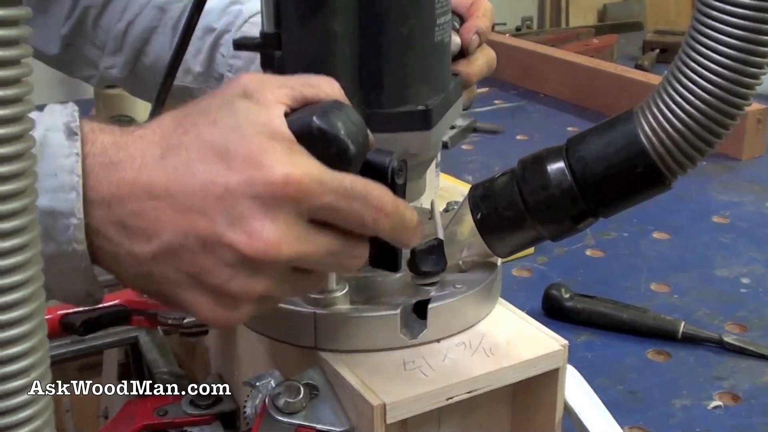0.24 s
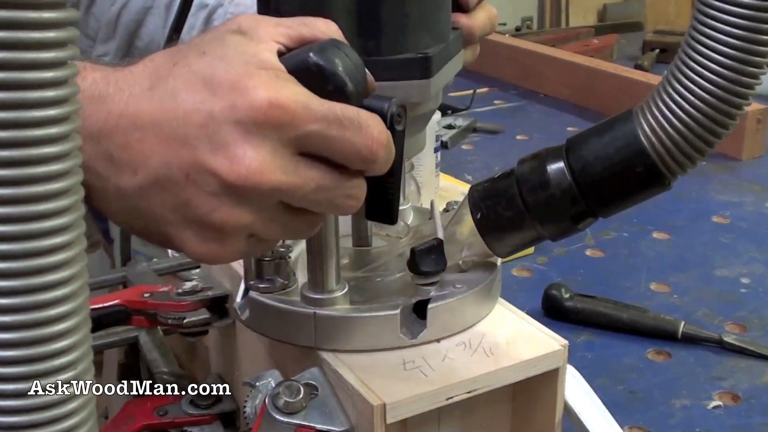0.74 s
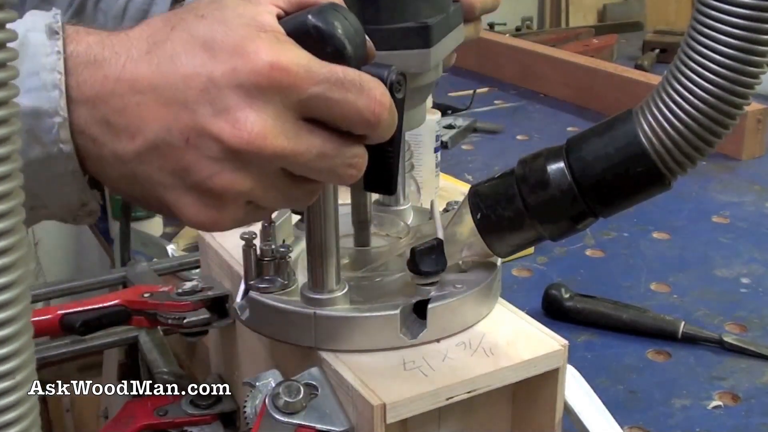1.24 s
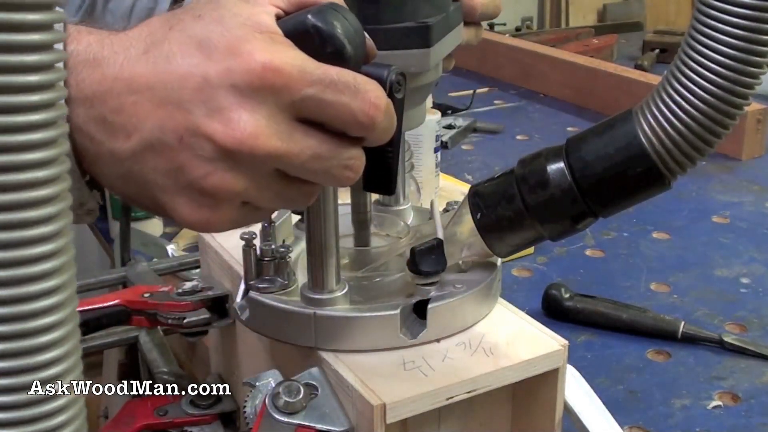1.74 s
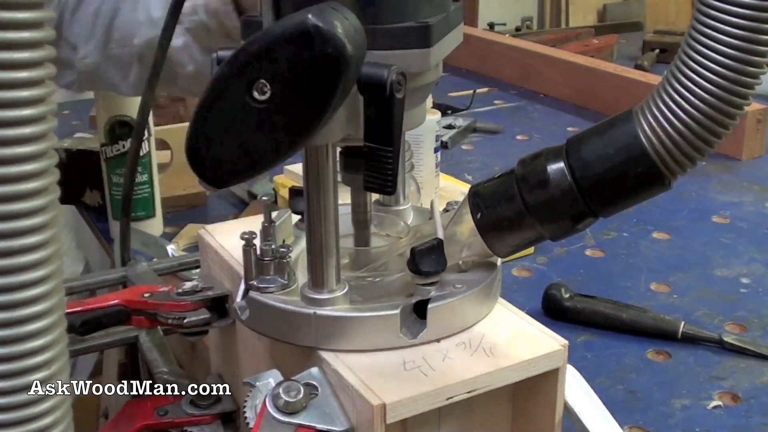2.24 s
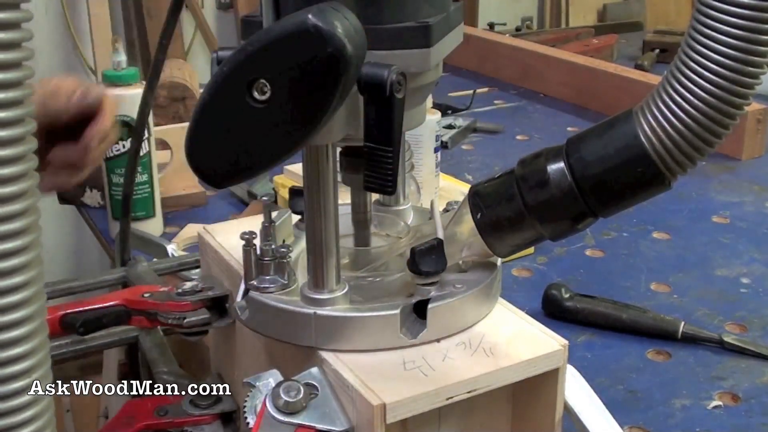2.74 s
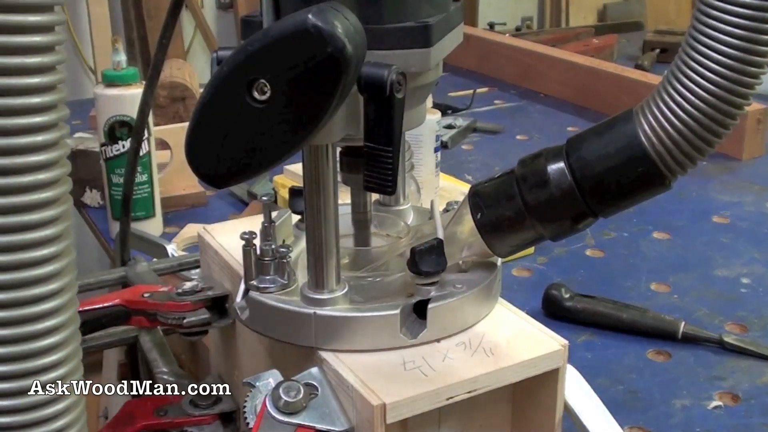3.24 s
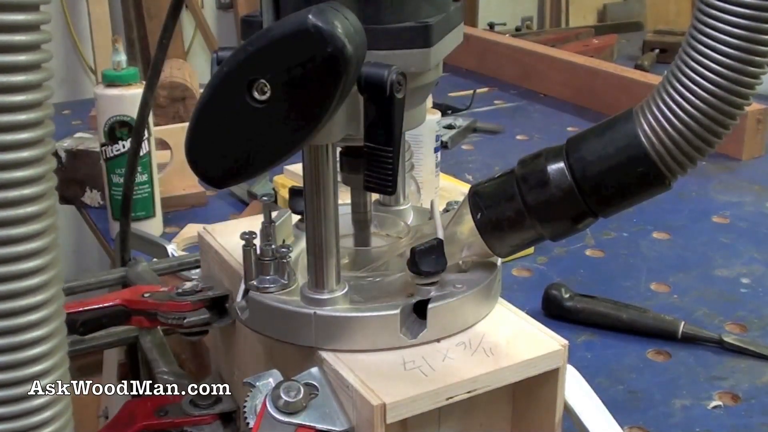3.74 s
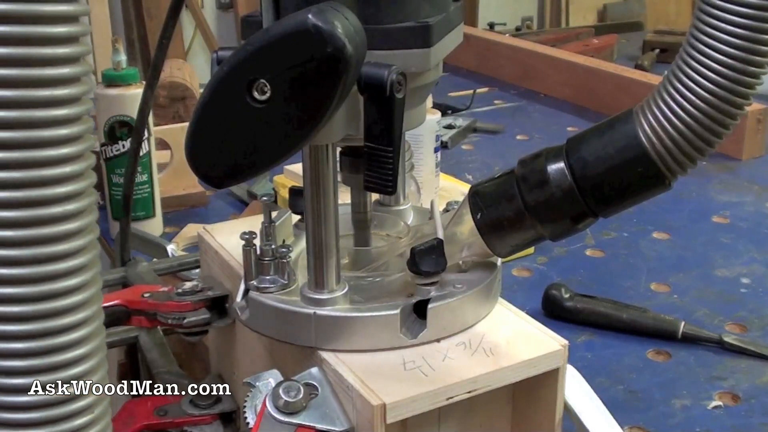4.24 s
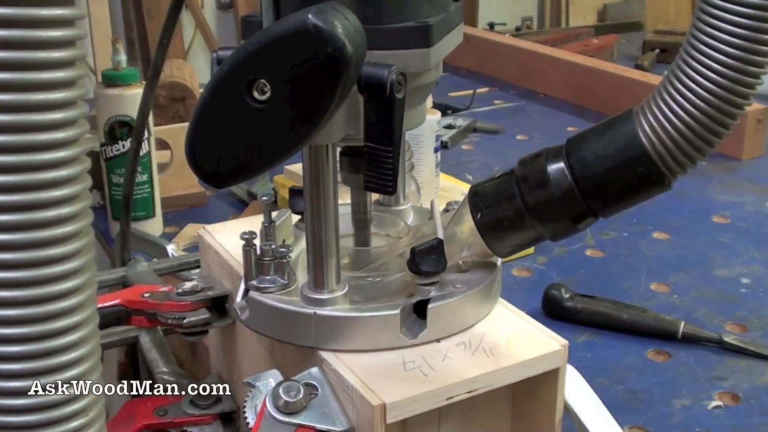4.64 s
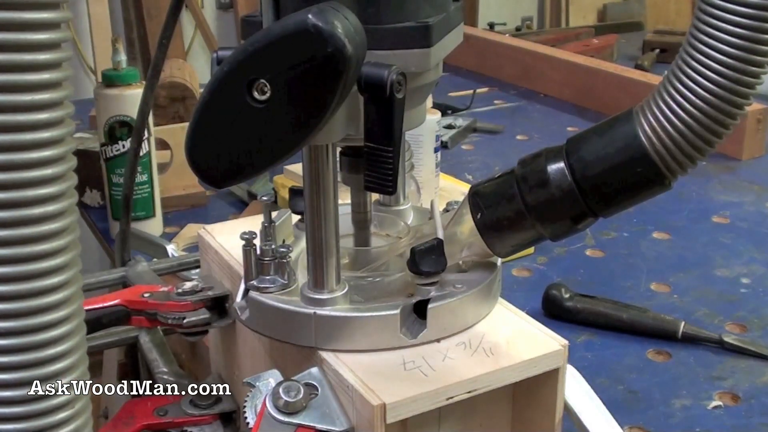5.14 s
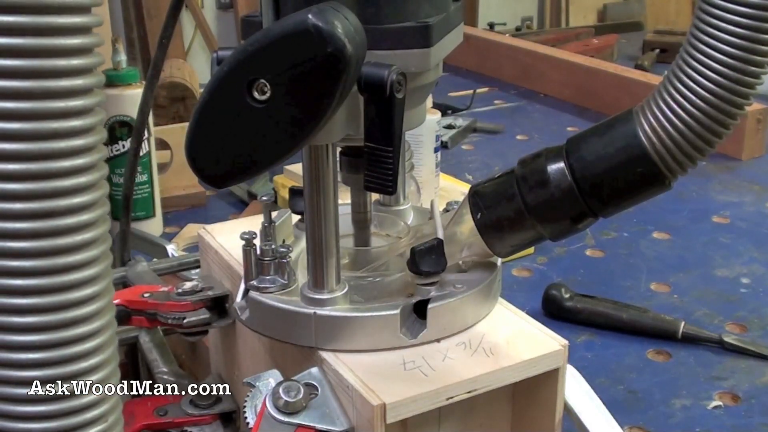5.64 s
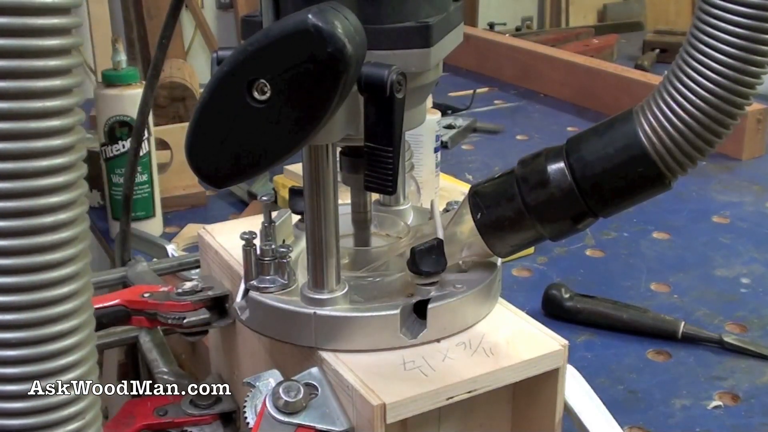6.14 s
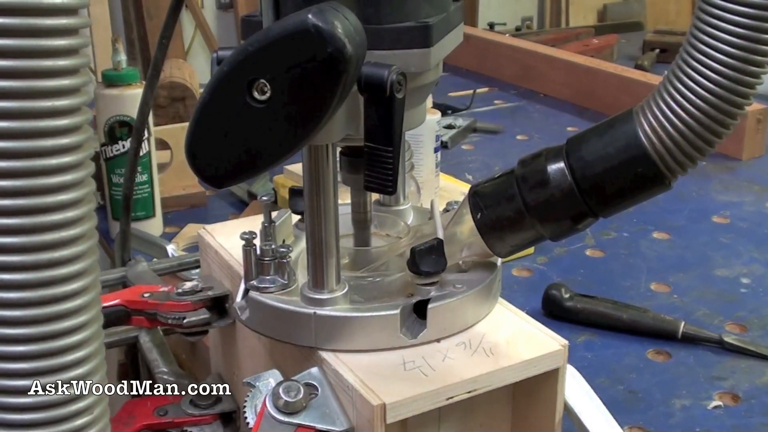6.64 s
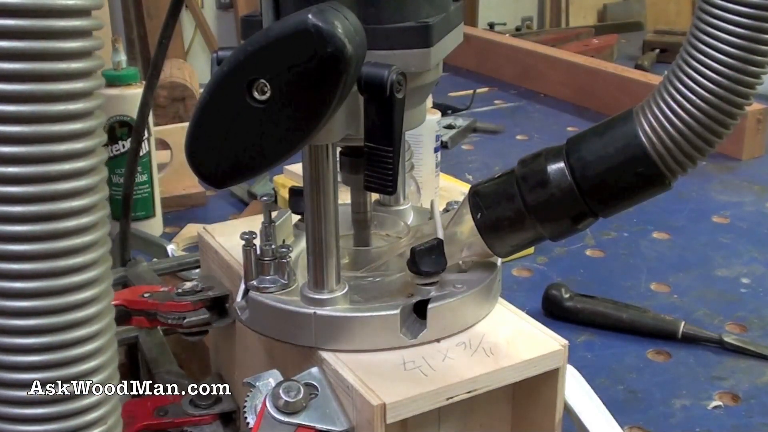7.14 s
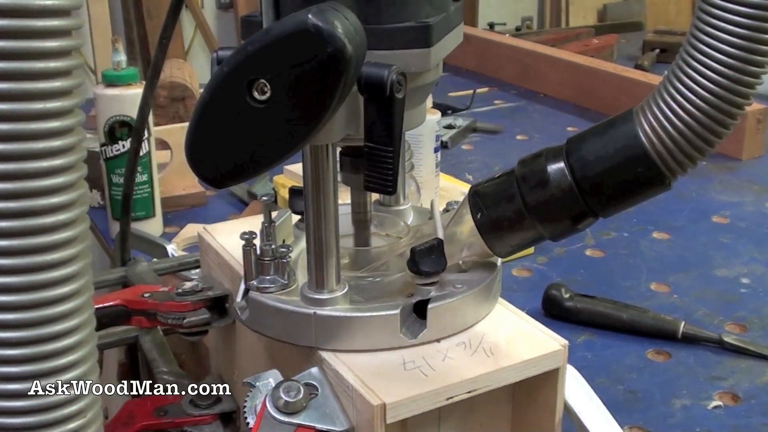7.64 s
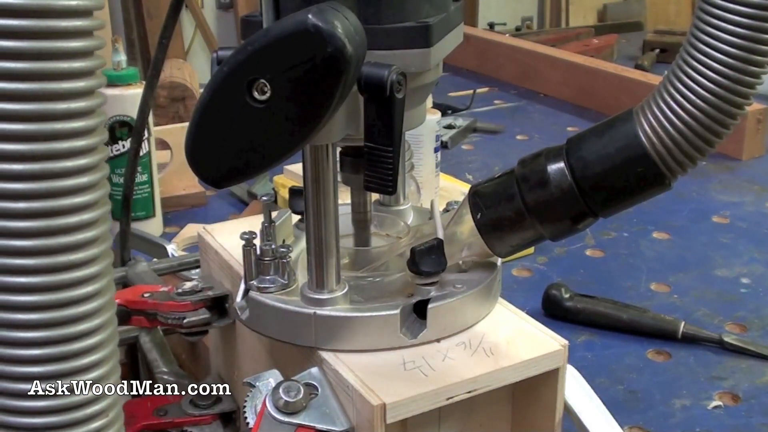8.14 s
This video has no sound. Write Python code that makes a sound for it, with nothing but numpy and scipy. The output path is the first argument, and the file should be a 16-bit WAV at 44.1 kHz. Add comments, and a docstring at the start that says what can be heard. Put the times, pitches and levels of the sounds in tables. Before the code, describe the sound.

A router finishes cutting wood, whines freely, then is switched off and slowly winds down over a humming dust extractor.

```python
"""A plunge router ends a cut in wood in a small workshop; a dust extractor rumbles and hums throughout.
At 0.36 s the bit leaves the wood and runs free; the 20-blade cooling fan whines like a siren over rushing air.
Switched off at 1.6 s, the shaft coasts: the whine falls, a dull swirl and a hollow roar near 680 Hz swell, and
harmonics from brushes and bearings slide through the ringing housing. The unbalanced shaft sweeps the bench's
resonances; a soft rumble swells near 3.4 s and a low groan sinks. The roar dies away with the router."""
import sys
import numpy as np
from scipy import signal
from scipy.fft import rfft, irfft, next_fast_len
from scipy.io import wavfile
from scipy.ndimage import uniform_filter1d, minimum_filter1d

SR = 44100
rng = np.random.default_rng(int(sys.argv[2]) if len(sys.argv) > 2 else 0)


def output_pcm(signal):
    """Save a mono or channel-first signal as 16-bit PCM at the path in sys.argv[1].

    Samples are clipped to [-1, 1] before scaling.
    """
    pcm = np.clip(np.atleast_2d(signal).T, -1, 1) * 32767
    wavfile.write(sys.argv[1], SR, np.round(pcm).astype(np.int16))


N = 370881
TIME_S = np.arange(N) / SR
FREE_SHAFT_HZ, FAN_BLADES = 336.25, 20
CUT_END_S, LOAD_RELEASE_S, SWITCH_OFF_S = 0.36, 0.25, 1.5974
CUTOFF_HZ = 15750


def from_db(db):
    """Decibels to gain."""
    return 10 ** (np.asarray(db) / 20)


def unit_rms(x):
    """Scale to rms 1."""
    return x / np.sqrt(np.mean(x ** 2) + 1e-20)


def envelope(curve):
    """Gain per sample from (time [s], level [dB]) points."""
    return from_db(np.interp(TIME_S, *np.transpose(curve)))


def coloured(x, spectrum):
    """Filter by (frequency [Hz], gain [dB]) points; the bass rolls off below the first."""
    hz, db = np.transpose(spectrum)
    size = next_fast_len(N + 4096)
    bins_hz = np.maximum(np.fft.rfftfreq(size, 1 / SR), 1)
    gain = from_db(np.interp(np.log(bins_hz), np.log(hz), db)) * np.minimum(bins_hz / hz[0], 1)
    return irfft(rfft(x, size) * gain, size)[..., :N]


def drift(rate_hz, hop=40):
    """Slow random wander, rms 1."""
    pole = np.exp(-2 * np.pi * hop * rate_hz / SR)
    noise = rng.standard_normal(N // hop + 2002)
    slow = signal.lfilter([1], [1, -2 * pole, pole ** 2], noise)[2000:]
    return np.interp(np.arange(N) / hop, np.arange(len(slow)), unit_rms(slow))


def rush(spectrum):
    """Turbulent noise of a given colour, rms 1."""
    return unit_rms(coloured(rng.standard_normal(N), spectrum))


def tone(cycles):
    """Sine of rms 1 from a running cycle count."""
    return np.sqrt(2) * np.sin((2 * np.pi * (cycles % 1)).astype(np.float32))


def ringing(x, modes):
    """Output of narrow resonances driven by x."""
    return sum(from_db(db) * signal.lfilter(*signal.iirpeak(hz, hz / width_hz, fs=SR), x)
               for hz, width_hz, db in modes)


def in_cut(release_s):
    """1 while the bit is in the wood, then an exponential decay."""
    return np.exp(-np.maximum(TIME_S - CUT_END_S, 0) / release_s)


def shaft_speed_hz(sag_hz=0.85, friction_hz_per_s=21.121, drag_hz_per_s=54.016, drag_power=2.2005):
    """The shaft sags under load; after switch-off, dry friction and fan drag brake it."""
    times_s, step_s = np.linspace(SWITCH_OFF_S, TIME_S[-1], 7000, retstep=True)
    hz = [FREE_SHAFT_HZ]
    for _ in times_s[1:]:
        braking = friction_hz_per_s + drag_hz_per_s * (hz[-1] / FREE_SHAFT_HZ) ** drag_power
        hz.append(hz[-1] - step_s * braking)
    return np.interp(TIME_S, times_s, hz) - sag_hz * in_cut(LOAD_RELEASE_S)


# Bit buzz: (order [x shaft speed], cutting level [dB], free level [dB])
BIT_ORDERS = [(2, -25.5, -33), (4, -19.5, -50), (6, -20, -42), (16, -22.5, -80)]
# Chip noise: (frequency [Hz], relative density [dB])
CHIP_SPECTRUM = [(300, -20), (700, -11), (1700, 8), (2600, 6), (4500, -10), (6500, 1), (9000, 3),
                 (12000, -8), (15500, -32)]
def bit(turns, shaft_hz, rough_db=0.9, chips_db=-12.5):
    """Two edges bite each turn and throw chips; out of the wood they only stir the air."""
    load = in_cut(LOAD_RELEASE_S)
    stir = (shaft_hz / FREE_SHAFT_HZ) ** 3.1
    buzz = np.zeros(N)
    for order, cut_db, free_db in BIT_ORDERS:
        gain = from_db(cut_db) * load + from_db(free_db) * stir
        buzz += gain * from_db(rough_db * drift(26)) * tone(order * turns + rng.random())
    chips = rush(CHIP_SPECTRUM) * (1 + 0.17 * tone(2 * turns))
    return buzz + from_db(chips_db) * in_cut(release_s=0.067) * chips


# Impeller rumble: (frequency [Hz], relative density [dB])
RUMBLE_SPECTRUM = [(40, -26), (90, -34), (106, -20), (124, 1), (160, 4), (190, 0.5), (300, 3), (450, 0.5),
                   (800, -21)]
# Impeller hum: (frequency [Hz], level [dB re rumble])
HUM_TONES = [(56.5, -31), (113, -14), (168, -12), (226.1, -12), (279.9, -11.5), (339.1, -11), (393, -10),
             (672.9, -13), (1254, -11)]
def dust_extractor(rumble_db=-42, waver_db=5.5, wander_cycles=0.17):
    """The impeller rumbles steadily, with a wavering hum."""
    hum = sum(from_db(db + waver_db * drift(5)) * tone(hz * TIME_S + wander_cycles * drift(2))
              for hz, db in HUM_TONES)
    return from_db(rumble_db) * (rush(RUMBLE_SPECTRUM) + hum)


# Cooling air: (frequency [Hz], relative density [dB])
AIR_SPECTRUM = [(130, -31), (450, -13), (1200, -6), (1800, -5), (2400, -1.5), (3900, -1), (5100, -4.5),
                (6400, -2.5), (7400, -3), (8800, -3), (9800, -10.5), (10500, -13.5), (12000, -14),
                (15500, -28.5)]
# Air cavities: (frequency [Hz], width [Hz], gain [dB])
CAVITY_MODES = [(1310, 200, -10), (3180, 250, -9.5), (3880, 140, -5.5), (5970, 360, 0), (7600, 220, -39)]
def cooling_air(shaft_hz, full_speed_db=-8.5):
    """Air rushes through the router's cavities, dying with the shaft speed."""
    flow = from_db(full_speed_db) * (shaft_hz / FREE_SHAFT_HZ) ** 1.61
    air = rush(AIR_SPECTRUM)
    return flow * unit_rms(air + ringing(air, CAVITY_MODES))


# Fan whine: (time [s], level [dB])
WHINE_LEVEL = [(0, -22), (0.36, -20), (0.49, -7.5), (1.92, -11.5), (1.98, -24), (2.03, -12.5), (2.2, -4.5),
               (2.46, -11.5), (2.51, -19.5), (2.9, -20), (3.05, -10.5), (3.22, -12), (3.55, -18.5),
               (3.75, -17.5), (4.18, -15.5), (4.42, -27), (4.7, -16), (5.17, -12.5), (6, -16), (7.7, -23.5),
               (8.41, -35)]
def fan_whine(turns, flutter_db=1.6, jitter_db=-52, octave_db=-37):
    """Blades chop the air at the vents; turbulence shakes the tone's strength and timing."""
    passes = FAN_BLADES * turns + from_db(jitter_db) * drift(55)
    gain = envelope(WHINE_LEVEL) * from_db(flutter_db * drift(29))
    return gain * (tone(passes) + from_db(octave_db) * tone(2 * passes))


# Ordinary harmonic, before the housing: (time [s], level [dB])
RUB_LEVEL = [(0, -42), (2, -39), (3.7, -35), (6.3, -37.5), (7.5, -40.7), (8.41, -46.5)]
# Prominent harmonics: (order [x shaft speed], boost [dB])
STRONG_ORDERS = [(16, 9.5), (21, 5), (32, 7), (33, 6), (35, 3), (40, 7), (43, 5), (48, 7), (57, 5), (65, 7),
                 (70, 4), (77, 6), (87, 4), (96, 7), (97, 5)]
# Housing radiation: (frequency [Hz], gain [dB])
HOUSING_RESPONSE = [(200, -26), (700, -14), (1250, -18), (1700, -11), (2600, -12), (3400, -11), (4200, -5),
                    (5300, -4), (6600, -3.3), (7600, -3), (8800, -3), (10000, -19), (11500, -17),
                    (13200, -22), (15500, -28)]
# Housing resonances: (frequency [Hz], width [Hz], gain [dB])
HOUSING_MODES = [(1750, 320, 7), (4950, 350, 0), (6000, 350, -4), (8300, 400, -12), (10900, 400, -4)]
def brushes_and_bearings(turns, shaft_hz, uneven_db=1.6, ripple_db=2.6, hop=64):
    """The same small bumps recur every turn: a comb of harmonics, radiated by the housing."""
    boosts_db = dict(STRONG_ORDERS)
    grid_hz = np.arange(0, CUTOFF_HZ, 400)
    comb = np.zeros(N)
    for order in np.setdiff1d(np.arange(2, 135), FAN_BLADES):
        hz = order * shaft_hz[::hop]
        level_db = boosts_db.get(order, uneven_db * rng.standard_normal())
        # each harmonic slides through its own small resonances
        swell_db = ripple_db * np.interp(hz, grid_hz, rng.standard_normal(len(grid_hz)))
        gain = from_db(level_db + swell_db) * (hz < CUTOFF_HZ)
        comb += np.repeat(gain, hop)[:N] * tone(order * turns + rng.random())
    radiated = coloured(comb, HOUSING_RESPONSE)
    return envelope(RUB_LEVEL) * (radiated + ringing(radiated, HOUSING_MODES))


# Hollow roar: (time [s], level [dB])
ROAR_LEVEL = [(0, -26), (1.3, -35), (2.6, -27), (4.7, -21.5), (7.1, -24.5), (8.41, -32)]
# Hollow roar: (frequency [Hz], relative density [dB])
ROAR_SPECTRUM = [(115, -27), (330, -17), (520, -4.5), (610, -2), (680, 3.5), (790, -3.5), (950, -6),
                 (1200, -3), (1700, -16.5), (2600, -8), (5000, -33), (8800, -46), (10500, -49),
                 (15500, -50)]
def hollow_roar():
    """A hollow roar near 680 Hz swells as the router coasts, then dies away with it."""
    return envelope(ROAR_LEVEL) * rush(ROAR_SPECTRUM)


# Swirl: (time [s], level [dB])
SWIRL_LEVEL = [(0, -45), (2.2, -26), (2.7, -19), (3.7, -18.5), (4.5, -20.5), (6.4, -25.5), (7.2, -51),
               (8.41, -36)]
# Swirl: (frequency [Hz], relative density [dB])
SWIRL_SPECTRUM = [(400, -23), (650, -9), (820, 4.5), (1000, -1), (1400, 2.5), (2200, 1.5), (2800, -1.5),
                  (4200, -2.5), (9000, -25)]
def fan_swirl():
    """Air swirls dully round the coasting fan."""
    return envelope(SWIRL_LEVEL) * rush(SWIRL_SPECTRUM)


# Bench resonances: (frequency [Hz], width [Hz], gain [dB])
BENCH_MODES = [(168.7, 7.2, -22.5), (206, 9.7, -32), (230, 18, -35), (270, 21, -62)]
def bench_shake(turns, shaft_hz):
    """The unbalanced shaft shakes the bench once a turn; force goes as speed squared."""
    force = (shaft_hz / FREE_SHAFT_HZ) ** 2 * tone(turns)
    return ringing(force, BENCH_MODES)


# Groan: (time [s], level [dB])
GROAN_LEVEL = [(2.3, -51), (2.8, -41), (3.62, -53), (3.72, -29), (4.2, -41), (4.5, -51), (4.85, -38),
               (5.7, -42), (6.1, -70)]
def groan(from_hz=339, toward_hz=109, hold_until_s=3.29, sink_s=1.06, waver_db=3):
    """A low tone of wavering strength holds its pitch, then sinks."""
    hz = toward_hz + (from_hz - toward_hz) * np.exp(-np.maximum(TIME_S - hold_until_s, 0) / sink_s)
    return envelope(GROAN_LEVEL) * from_db(waver_db * drift(6.2)) * tone(np.cumsum(hz) / SR)


# Low swell: (frequency [Hz], relative density [dB])
SWELL_SPECTRUM = [(100, -34), (135, -6), (170, -9), (260, -7), (1000, -60)]
def low_swell(peak_s=3.38, half_width_s=0.53, peak_db=-37):
    """A soft rumble comes and goes just before the groan peaks."""
    return from_db(peak_db) * np.exp(-((TIME_S - peak_s) / half_width_s) ** 2) * rush(SWELL_SPECTRUM)


def workshop(x, t60_s, wet_db):
    """Dense reflections off bench and walls; a gliding tone swells and fades against its echoes."""
    age_s = TIME_S[:SR // 2]
    tail = rng.standard_normal(len(age_s)) * from_db(-60 * age_s / t60_s) * (age_s > 0.002)
    echoes = signal.fftconvolve(x, tail / np.sqrt(np.sum(tail ** 2)))[:N]
    wet = from_db(wet_db)
    return (x + wet * echoes) / np.sqrt(1 + wet ** 2)


# Stray reflections: (frequency [Hz], level [dB re common sound])
STRAY_RESPONSE = [(50, -28), (125, -35), (250, -26), (700, -18), (2000, -26), (8000, -27)]
def close_pair(x):
    """Two close capsules hear nearly the same; only stray reflections differ."""
    side = coloured(workshop(x, t60_s=0.3, wet_db=30), STRAY_RESPONSE)
    return np.array([x + side, x - side])


def gain_control(x, threshold_db=-6, ratio=4.9, hold_s=0.023, response_s=0.038):
    """Peaks above threshold turn the gain down, so the air ducks under the whine."""
    peaks = -minimum_filter1d(-np.abs(x).max(axis=0), int(hold_s * SR))
    level_db = 20 * np.log10(uniform_filter1d(peaks, int(response_s * SR)) + 1e-9)
    excess_db = np.maximum(level_db - threshold_db, 0)
    return x * from_db(-excess_db * (1 - 1 / ratio))


def scene():
    """Router and extractor in stereo; one shaft drives bit, air, whine, rub and bench."""
    shaft_hz = shaft_speed_hz()
    turns = np.cumsum(shaft_hz) / SR
    mix = bit(turns, shaft_hz) + dust_extractor() + hollow_roar() + cooling_air(shaft_hz)
    # the whine beams straight from the vents; part of the rub arrives via the bench
    mix += workshop(fan_whine(turns), t60_s=0.35, wet_db=-15)
    mix += workshop(brushes_and_bearings(turns, shaft_hz), t60_s=0.12, wet_db=-7)
    mix += fan_swirl() + bench_shake(turns, shaft_hz) + groan() + low_swell()
    return close_pair(mix)


def record(dry):
    """Gain control, then a steep low-pass."""
    lowpass = signal.ellip(12, 0.1, 90, CUTOFF_HZ, fs=SR, output="sos")
    return signal.sosfilt(lowpass, gain_control(dry))


dry = scene()
out = record(dry)
output_pcm(out)
```